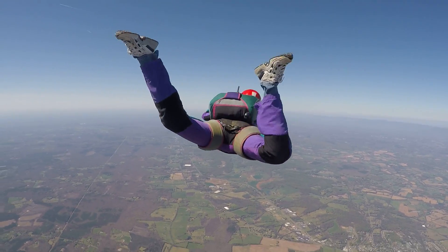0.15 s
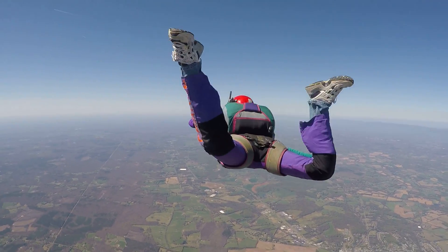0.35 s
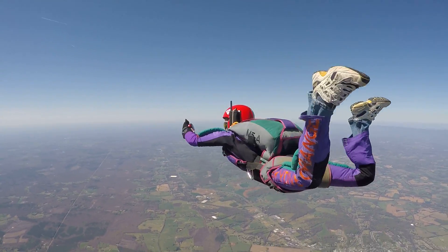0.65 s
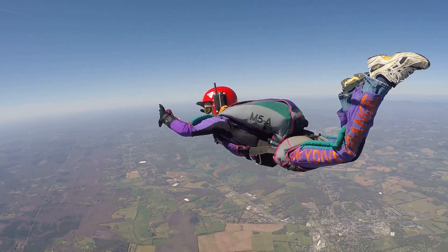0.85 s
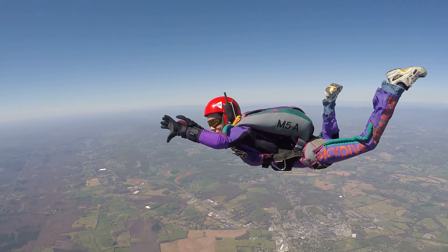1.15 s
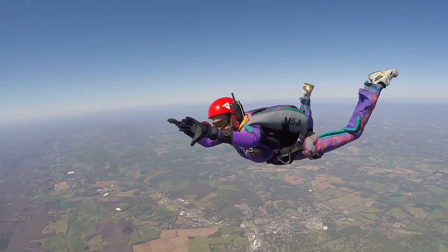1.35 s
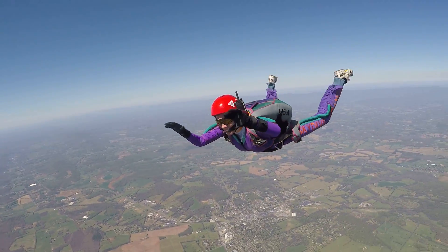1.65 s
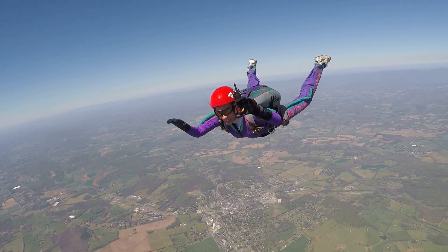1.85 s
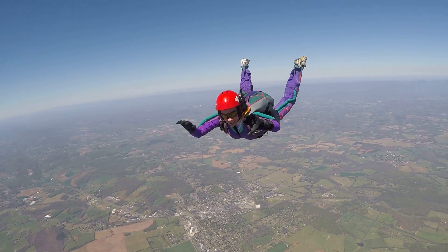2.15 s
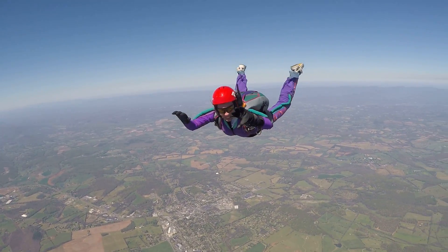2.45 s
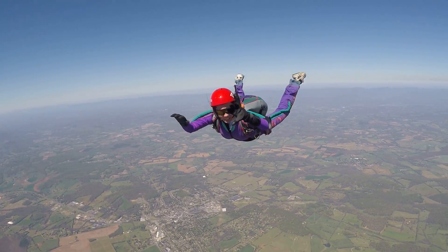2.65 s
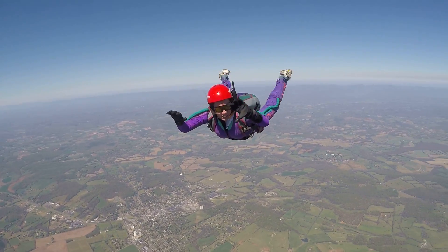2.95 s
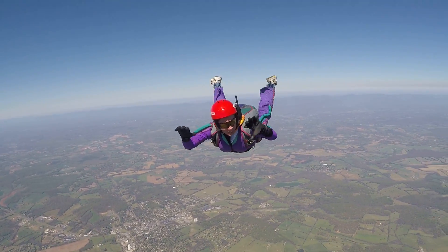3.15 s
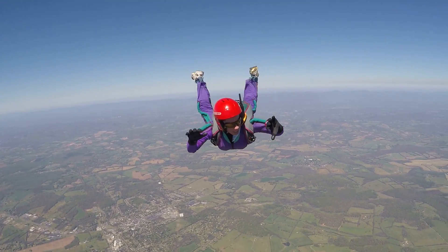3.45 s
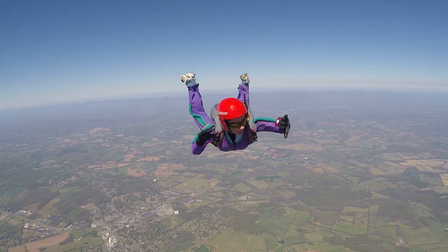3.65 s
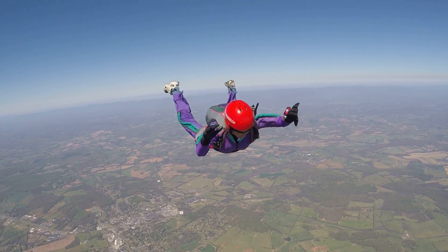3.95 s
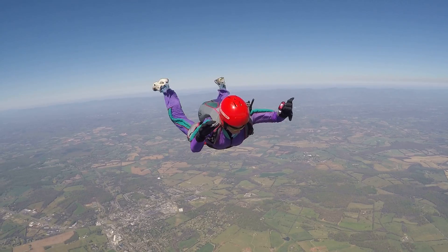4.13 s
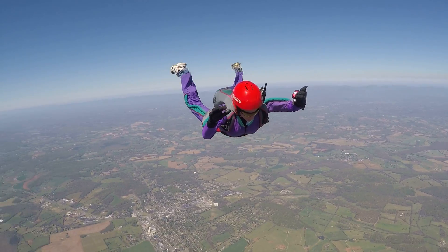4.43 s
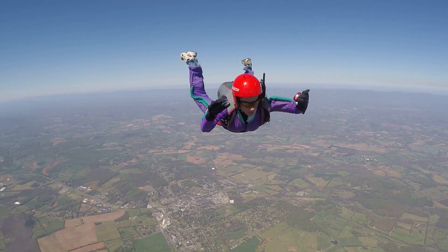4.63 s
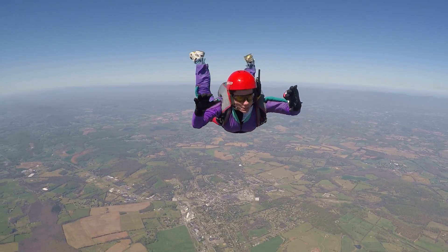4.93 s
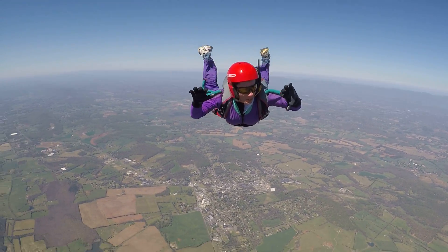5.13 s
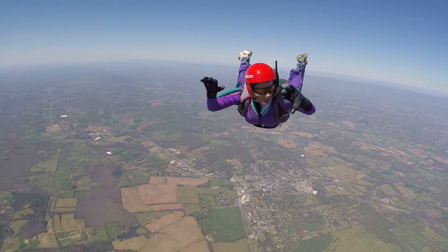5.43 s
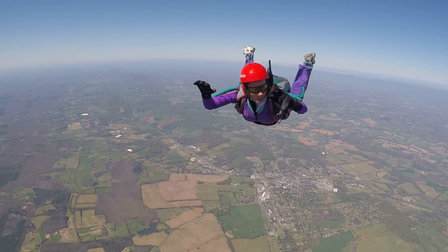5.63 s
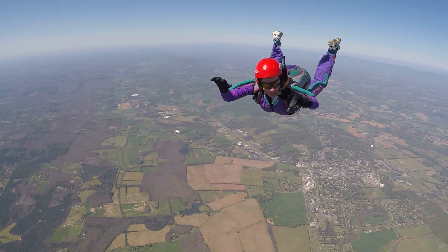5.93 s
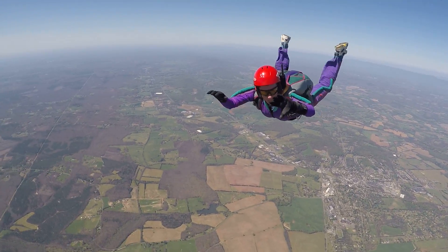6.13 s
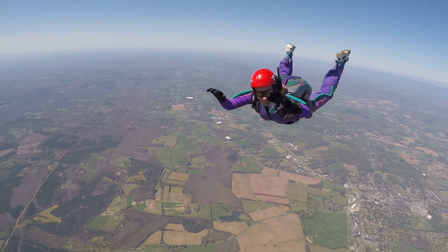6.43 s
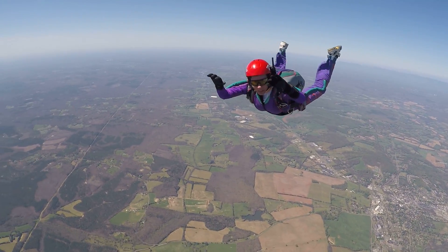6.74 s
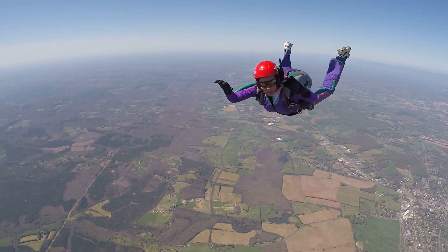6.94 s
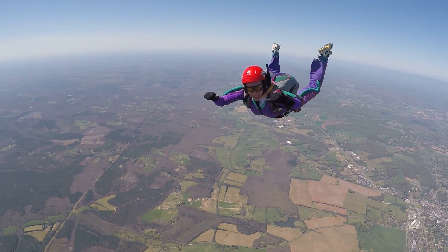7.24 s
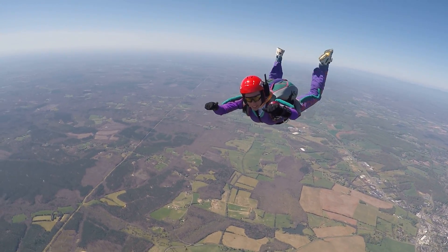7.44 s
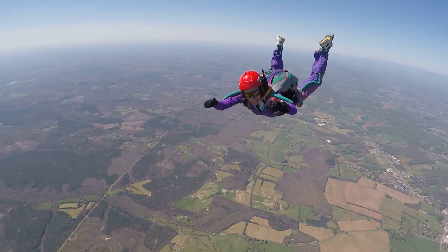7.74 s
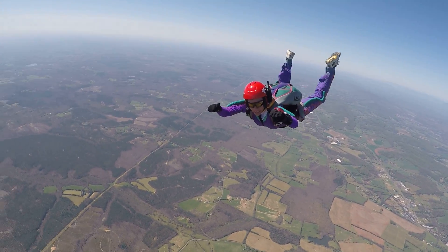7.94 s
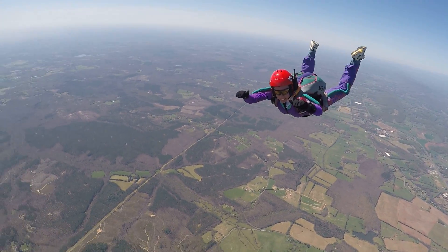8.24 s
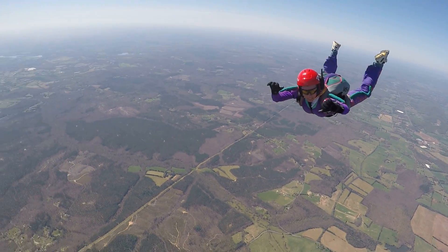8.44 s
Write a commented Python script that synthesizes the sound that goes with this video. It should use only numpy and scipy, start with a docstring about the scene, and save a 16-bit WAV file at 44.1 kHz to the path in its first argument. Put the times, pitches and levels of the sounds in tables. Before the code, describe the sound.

Loud freefall wind pounds a skydiver's helmet camera, deep rumbling buffets under sputtering gusts and hiss that turns much brighter near the end.

```python
"""Freefall wind tears past a helmet camera, made from random noise shaped in colour and level.
Large eddies buffet the microphone port with a deep rumble, a throb, a slow heave and a lumpy churn.
Smaller eddies break at the port's edge in sputtering gusts and bursts of roar and hiss, over an even hiss.
The housing's cavity adds short pips, made from fading sine waves.
The camera's gain control narrows the loudness range and rounds off the peaks."""
import sys
import numpy as np
from scipy import signal
from scipy.fft import rfft, irfft, next_fast_len
from scipy.io import wavfile
from scipy.ndimage import uniform_filter1d, map_coordinates

SR = 44100
rng = np.random.default_rng(int(sys.argv[2]) if len(sys.argv) > 2 else 0)


def master_out(mix):
    """Clip the mix to full scale and print it as 16-bit PCM to the path in sys.argv[1]."""
    frames = np.transpose(np.atleast_2d(mix))
    ceiling = np.clip(frames, -1, 1)
    pcm = np.round(ceiling * 32767).astype(np.int16)
    wavfile.write(sys.argv[1], SR, pcm)


N = 378378

# the airstream between gusts: (time [s], even hiss level [dB], roar level before gusts and drift [dB])
AIRFLOW = [(0.0, -51, -28), (0.5, -54, -31), (1.2, -53.5, -32), (1.86, -53, -32), (2.05, -58, -36),
           (2.87, -51.5, -29), (3.32, -53, -33), (3.68, -51, -28), (4.1, -56, -34), (4.61, -50, -27),
           (4.9, -52.5, -28), (5.27, -54.5, -29), (5.49, -48, -24.5), (6.16, -46, -22), (6.45, -48, -24),
           (6.9, -49.5, -26), (7.38, -49, -18), (7.75, -47, -22), (8.1, -31.5, -17.5), (8.3, -35, -17.5),
           (8.58, -40.5, -22)]


def amp(db):
    """Turn a level in dB into a gain."""
    return 10 ** (np.asarray(db) / 20)


def unit(x):
    """Scale x to an average strength (rms) of 1."""
    return x / np.sqrt(np.mean(x ** 2) + 1e-20)


def curves(rows):
    """Draw straight lines between the rows: one value per sample for each column after the time."""
    s, *columns = np.transpose(rows)
    return [np.interp(np.arange(N) / SR, s, column) for column in columns]


def wobble(rate):
    """Draw a smooth random curve through `rate` random points a second."""
    knots = rng.standard_normal(N // 20)
    return map_coordinates(knots, [np.arange(N) * rate / SR])


def filtered(x, response):
    """Multiply each frequency of x by response(frequency in Hz)."""
    m = next_fast_len(N + 8192)  # spare room keeps the end from wrapping round to the start
    spectrum = rfft(x, m) * response(np.fft.rfftfreq(m, 1 / SR))
    return irfft(spectrum, m)[..., :N]


def rush(spectrum, patchy_db):
    """Moving air: noise of rms 1 in a (Hz, dB) colour, with random louder and softer patches."""
    z = signal.stft(rng.standard_normal(N), nperseg=256)[2]
    # smooth random gains, first across frequency and then across time
    field = uniform_filter1d(rng.standard_normal(z.shape), size=8, axis=0)
    field = uniform_filter1d(field, size=4, axis=1)
    noise = signal.istft(z * amp(patchy_db * unit(field)), nperseg=256)[1][:N]
    hz, db = np.transpose(spectrum)
    return unit(filtered(noise, lambda f: amp(np.interp(np.log(f + 1), np.log(hz + 1), db))))


def buffet():
    """Big eddies push the diaphragm; part of them is shed at a loose, wandering rate and throbs."""
    # the deep buffeting before random drift: (time [s], rumble level [dB], throb level [dB])
    buffet_levels = [(0.0, -12, -18), (0.4, -15.5, -24), (1.17, -14.5, -19), (1.55, -16.5, -21),
                     (1.85, -13.5, -14), (2.0, -20, -24), (2.34, -13, -12), (2.95, -12, -25),
                     (3.25, -14.5, -13), (3.7, -15, -14), (4.2, -14.5, -19), (4.6, -14.5, -16),
                     (5.07, -14, -14), (5.2, -13, -36), (5.6, -12.5, -25), (5.95, -12, -21),
                     (6.2, -14, -15), (6.45, -15, -27), (6.72, -12, -11), (6.91, -22, -23),
                     (7.3, -13.5, -28), (7.55, -13, -26), (7.87, -19, -20), (8.15, -15, -28),
                     (8.58, -14, -24)]
    # colour of the rumble: (frequency [Hz], relative level [dB])
    rumble_colour = [(8.8, -36), (15, -3), (65, -4), (120, -8), (157, -12.5), (286, -23.5), (332, -33),
                     (373, -28), (500, -42.5), (650, -62), (1100, -120)]
    # vortices shed at a loose rate: (middle rate [Hz], width [Hz])
    shedding = (67, 13.2)
    rumble_db, throb_db = curves(buffet_levels)
    center, width = shedding

    # two slow noises steer the strength and timing of the throb
    slow = filtered(rng.standard_normal((2, N)), lambda f: 1 / (1 + (2 * f / width) ** 2))
    phase = 2 * np.pi * np.cumsum(center * (1 + 0.0699 * wobble(4))) / SR
    throb = unit(slow[0] * np.cos(phase) + slow[1] * np.sin(phase))
    throb = amp(throb_db + 1.5 * wobble(5)) * throb

    rumble_gain = amp(rumble_db + 1.3 * wobble(11) + 1.2 * wobble(3))
    return rumble_gain * rush(rumble_colour, patchy_db=0.3) + throb


def gusts(lingers):
    """Level in dB of the gusts alone: each climbs to its crest and sinks back, `lingers` times as slowly."""
    # gusts on the port: (time [s], crest of the hiss [dB], rise per 10 dB [s], fall per 10 dB of hiss [s])
    gust_rows = [(.0, -43, .03, .05), (.16, -42, .3, .11), (.33, -38.5, .036, .023), (.46, -48, .04, .2),
                 (.74, -47.5, .3, .2), (.88, -50, .1, .1), (1.0, -46.5, .11, .3), (1.29, -41, .013, .03),
                 (1.36, -39.5, .06, .026), (1.72, -42.5, .02, .035), (1.79, -46, .15, .24),
                 (2.34, -50.5, .23, .5), (2.58, -43.5, .05, .2), (2.87, -42, .095, .075),
                 (2.96, -46, .036, .13), (3.09, -46.5, .1, .05), (3.185, -32, .03, .06),
                 (3.4, -39, .04, .05), (3.53, -36.5, .035, .023), (3.73, -37.5, .045, .09),
                 (4.04, -47, .11, .08), (4.18, -48.5, .09, .25), (4.44, -41.5, .03, .11),
                 (4.71, -44.5, .17, .03), (4.78, -43.5, .02, .07), (4.97, -43, .03, .2),
                 (5.33, -37.5, .024, .054), (5.45, -38.5, .023, .025), (5.64, -42, .3, .03),
                 (5.72, -38.5, .055, .04), (5.82, -40, .08, .08), (5.98, -40.5, .075, .2),
                 (6.09, -36, .2, .033), (6.16, -38.5, .016, .08), (6.24, -37, .04, .1),
                 (6.4, -33, .085, .08), (6.69, -37.5, .1, .04), (6.79, -43, .15, .08),
                 (7.05, -35, .07, .03), (7.18, -36.5, .05, .045), (7.26, -34, .036, .055),
                 (7.55, -38.5, .3, .16), (7.77, -40.5, .03, .12), (7.96, -29.5, .11, .4),
                 (8.16, -24, .1, .05), (8.24, -28, .065, .18), (8.54, -27, .04, .3)]
    t = np.arange(0, N / SR, .001)
    lines = []
    for s, db, rise, fall in gust_rows:
        lines.append(db - 10 * np.maximum((s - t) / rise, (t - s) / (fall * lingers)))
    return np.interp(np.arange(N) / SR, t, np.max(lines, axis=0))


def crackle(count, spread_db, length):
    """Power over time of tiny random bursts, many weak and a few strong; length in s."""
    draw = rng.random((count, 2))
    strength = amp(-2 * spread_db * np.log(draw[:, 1] + 0.0018))
    spikes = np.bincount((draw[:, 0] * N).astype(int), strength, N)
    t = np.arange(-200, 201) / SR
    smeared = np.convolve(spikes, np.exp(-(t / length) ** 2), "same")
    return smeared / smeared.mean()


def bursts(hiss_db, depth, count):
    """Power over time of spray and roar: eddies swell and die in a few ms, the roar more slowly."""
    # the loudest eddies bursting on the port:
    # (time [s], spray level without its tick [dB], roar over spray [dB], length scale [ms])
    loud_bursts = [(.049, -32, 20, 2.1), (.084, -40.5, 24, 1.4), (.128, -29, 5, 2.9), (.164, -29, 17, 1.6),
                   (.1734, -29.5, 15, 2.2), (.214, -29, 12, 1.4), (.325, -31, 8, 4),
                   (.3494, -44.5, 24, 2.4), (.454, -35, 17, 3.2), (.707, -34, 18, 3.1),
                   (.744, -37.5, 18, 1.5), (.9542, -40, 13, 1.6), (.974, -42.5, 20, 1.8),
                   (1.087, -35.5, 16, 4.9), (1.1791, -39, 11, 1.4), (1.285, -32.5, 14, 2),
                   (1.379, -37.5, 8, 1.4), (1.443, -40, 16, 4.1), (1.519, -42, 22, 2.6),
                   (1.6305, -33.5, 16, 1.9), (1.6793, -38.5, 23, 2), (1.7144, -34.5, 18, 2.6),
                   (1.884, -39.5, 19, 5), (2.013, -38.5, 16, 1.5), (2.26, -38.5, 16, 1.8),
                   (2.366, -33.5, 17, 1.7), (2.4625, -37, 19, 2.8), (2.574, -30, 17, 4),
                   (2.6117, -30, 15, 1.7), (2.619, -31.5, 13, 1.4), (2.636, -34, 15, 3.3),
                   (2.6797, -34, 15, 2.2), (2.7211, -36.5, 13, 2), (2.792, -41, 21, 4.1),
                   (2.83, -33.5, 12, 1.4), (2.8766, -27, 16, 1.8), (2.977, -35, 18, 1.5),
                   (3.1, -37, 15, 2.5), (3.1654, -26, 10, 2.8), (3.206, -27.5, 12, 3.8),
                   (3.252, -36.5, 22, 2.4), (3.387, -26.5, 14, 1.7), (3.405, -26, 9, 2),
                   (3.416, -31.5, 17, 2.2), (3.4362, -33.5, 16, 3.1), (3.502, -32.5, 10, 1.2),
                   (3.5135, -31.5, 11, 1), (3.5435, -31.5, 15, 1.7), (3.58, -34.5, 19, 1.5),
                   (3.7196, -27.5, 12, 5.5), (3.734, -28.5, 7, 1.2), (3.7648, -30.5, 15, 1.9),
                   (3.942, -36, 0, 1.8), (4.4256, -29.5, 18, 2.6), (4.4494, -25.5, 16, 3.8),
                   (4.46, -32, 19, 3.1), (4.521, -36, 14, 1.5), (4.5692, -37, 22, 3.2),
                   (4.601, -32.5, 22, 2.1), (4.689, -28.5, 14, 2), (4.6977, -30, 13, 3.4),
                   (4.794, -34, 17, 2.1), (4.979, -30.5, 12, 2.8), (5.028, -32.5, 16, 1.2),
                   (5.1354, -35.5, 14, 1.7), (5.3203, -34, 14, 1.4), (5.447, -25.5, 14, 2.7),
                   (5.589, -35.5, 20, 1.7), (5.701, -32, 15, 2.3), (5.733, -28.5, 16, 2.3),
                   (5.965, -27.5, 15, 5.2), (6.011, -30.5, 16, 1.3), (6.03, -24.5, 11, 1.9),
                   (6.057, -25.5, 16, .9), (6.117, -30.5, 15, 3.2), (6.162, -27.5, 7, 2.2),
                   (6.178, -27.5, 9, 2.1), (6.227, -28.5, 14, 1.3), (6.236, -30, 9, 2.1),
                   (6.278, -27.5, 9, 1.8), (6.3555, -27, 14, 1.2), (6.3938, -30.5, 14, 3.3),
                   (6.447, -30, 13, 2), (6.488, -34.5, 13, 1.8), (6.7023, -32.5, 12, 1.7),
                   (6.7564, -30, 13, 1.4), (6.801, -39, 24, 2.4), (6.992, -38, 22, 1.8),
                   (7.0393, -26.5, 17, 2.4), (7.157, -30, 12, 2), (7.1885, -32.5, 18, 2.6),
                   (7.2705, -21, 11, 2.4), (7.2829, -28.5, 15, 1.3), (7.319, -37.5, 25, 1.3),
                   (7.3772, -31.5, 16, 3.4), (7.402, -36.5, 21, 1.9), (7.419, -30, 13, 1.8),
                   (7.497, -26.5, 18, 3.7), (7.55, -33.5, 18, 1.6), (7.608, -32.5, 23, 3.7),
                   (7.782, -32, 13, 4.2), (7.8396, -30.5, 17, 2.7), (7.868, -25.5, 19, 1),
                   (8.373, -27, 12, 4.6), (8.407, -25.5, 14, 2)]
    spray, roar = np.zeros(N + SR), np.zeros(N + SR)
    t = np.arange(-800, 801) / SR

    # small bursts at random times, with the same columns
    draw = rng.random((count, 4))
    when = (draw[:, 0] * N).astype(int)
    small_db = hiss_db[when] + depth[when] * (2 + 7 * draw[:, 1])
    small_roar_db = 7 + 12 * draw[:, 3]
    small_ms = 1.9 * (.5 + draw[:, 2])
    small = np.c_[when / SR, small_db, small_roar_db, small_ms]

    for s, db, roar_db, ms in np.r_[small, loud_bursts]:
        start = max(round(s * SR) - 800, 0)
        at = slice(start, start + len(t))
        length = ms / 1000
        swell = np.exp(-np.abs(t / (0.66 * length)) ** 1.23)
        tick = 1.08 * np.exp(-(t / 0.00032) ** 2)  # a sharp tick at the crest
        spray[at] += amp(2 * db) * (swell + tick)  # doubling the dB turns a gain into a power
        roar[at] += amp(2 * (db + roar_db)) * np.exp(-(t / (1.43 * length)) ** 2)
    return spray[:N], roar[:N]


def stream():
    """Small eddies sputter at the port; roar and hiss share gusts and sputter, evening out in strong flow."""
    # colour of the hiss through the housing: (frequency [Hz], relative level [dB])
    hiss_colour = [(590, -8), (1000, 3), (1430, -9), (1840, -2.5), (2730, -5), (2960, -3.5), (4960, -11),
                   (5640, -9), (6860, -14.5), (10100, -15.5), (10900, -20), (12200, -20.5), (13200, -21.5),
                   (14700, -22), (15700, -35)]
    # colour of the bursts' brighter hiss: (frequency [Hz], relative level [dB])
    spray_colour = [(590, -24), (1000, 0), (1950, -14), (2730, -8), (3240, -13.5), (3590, -9),
                    (4320, -17.5), (9580, -21.5), (11400, -26.5), (14200, -31), (15700, -42)]
    # colour of the roar: (frequency [Hz], relative level [dB])
    roar_colour = [(59, -44), (100, -2.5), (172, -0.5), (281, -3), (384, -7.5), (466, -10.5), (987, -25),
                   (1330, -33.5), (2200, -45.5), (2860, -85), (4840, -120)]
    flow_db, roar_db = curves(AIRFLOW)
    calm_db = flow_db - 1.2  # sputtering hiss between gusts, set from the even hiss
    hiss_db = np.maximum(calm_db + 1.2 * wobble(14), gusts(1))

    # the roar rises .6 dB per dB of gust and sinks more slowly than the hiss
    gust_lift_db = np.maximum(gusts(1.5) - calm_db, 0)
    roar_db = roar_db + .6 * gust_lift_db + 1.5 * wobble(12)

    depth = np.interp(flow_db, [-50, -40], [1, .45])  # less sputter in a strong flow
    sputter_db = depth * (0.66 * wobble(40) + 2.0 * wobble(110) + 2.3 * wobble(260))
    spray_burst, roar_burst = bursts(hiss_db, depth, count=200)
    share = np.clip(0.33 * depth, 0, 1)  # part of the hiss power that crackles
    spits = 1 - share + share * crackle(count=500, spread_db=3.0, length=0.00041)

    # square roots turn power into gain
    hiss = amp(hiss_db + sputter_db) * np.sqrt(spits) * rush(hiss_colour, patchy_db=2.0)
    spray = np.sqrt(spray_burst) * amp(1.6 * wobble(500)) * rush(spray_colour, patchy_db=2.0)
    roar_power = amp(2 * (roar_db + 0.82 * sputter_db)) + roar_burst
    roar = np.sqrt(roar_power) * rush(roar_colour, patchy_db=1.22)
    return hiss + spray + roar


def even_hiss():
    """Air streaming over helmet and suit gives a smooth hiss that never stops."""
    # colour of the even hiss: (frequency [Hz], relative level [dB])
    calm_colour = [(590, -30), (1000, -6.5), (1740, -9), (3510, -10.5), (4580, -11), (5140, -21.5),
                   (6110, -16), (7260, -23), (13200, -36), (14500, -36), (15700, -46)]
    level_db = curves(AIRFLOW)[0]
    return amp(level_db) * rush(calm_colour, patchy_db=2.5)


def heave():
    """The largest eddies press slowly on the port: very low noise with a drifting level."""
    # the slowest heave of the air before random drift: (time [s], level [dB])
    heave_levels = [(0.0, -18), (0.5, -16), (1.3, -24), (2.03, -28), (3.68, -21.5), (4.44, -27),
                    (5.93, -29), (7.33, -24), (8.58, -25)]
    # colour of the heave: (frequency [Hz], relative level [dB])
    heave_colour = [(10, -11.5), (30, 0.5), (45, -4.5), (60, -40), (100, -120)]
    level_db, = curves(heave_levels)
    return amp(level_db + 2.5 * wobble(12)) * rush(heave_colour, patchy_db=0.3)


def churn():
    """Middling eddies give a lumpy low roll between rumble and roar."""
    # the churn before random drift: (time [s], level [dB])
    churn_levels = [(0, -40), (2.8, -36), (3.8, -28), (5.1, -29), (5.7, -21), (6.1, -28), (6.9, -30),
                    (7.4, -22), (7.85, -18), (8.05, -29), (8.58, -29)]
    # colour of the churn: (frequency [Hz], relative level [dB])
    churn_colour = [(70, -40), (120, -3), (190, 0), (280, -6), (420, -30), (700, -120)]
    level_db, = curves(churn_levels)
    return amp(level_db + 2.5 * wobble(9)) * rush(churn_colour, patchy_db=0.8)


def pips():
    """The cavity rings briefly now and then as a fading sine; faint pips come at random."""
    # short pips of the cavity: (time [s], level before fade-in and fade-out [dB], pitch [Hz])
    clear_pips = [(0.9732, -43.5, 3040), (1.1363, -39.5, 3250), (1.1882, -45.5, 3580),
                  (1.3024, -42.5, 3370), (1.9669, -42.5, 3360), (2.1335, -35.5, 3220),
                  (2.1854, -45.5, 3490), (2.2194, -41.5, 3560), (3.0235, -40.5, 3190),
                  (3.3253, -43.5, 3560), (3.3368, -36.5, 3260), (3.3514, -39.5, 3630),
                  (3.9414, -39.5, 3530), (4.4094, -33.5, 3460), (4.492, -35.5, 3300)]
    out, t = np.zeros(N + SR), np.arange(SR // 12) / SR
    chance = rng.random((120, 3))
    faint = np.c_[chance[:, 0] * N / SR, -48.5 + 8 * chance[:, 1], 3150 + 550 * chance[:, 2]]
    for s, db, hz in np.r_[clear_pips, faint]:
        fade_out = amp(db - 60 * t / .03)  # falls 60 dB in .03 s
        fade_in = 1 - np.exp(-t / 0.00095)
        out[round(s * SR):][:len(t)] += fade_out * fade_in * np.sin(2 * np.pi * hz * t)
    return out[:N]


def scene():
    """Add up all the sounds that arrive at the one port."""
    return (buffet() + stream() + even_hiss() + heave() + churn() + pips())[None]


def record(dry):
    """Gain control evens out loud and soft, the peaks round off, nothing passes above the band limit."""
    ceiling, top_hz = .93, 15830  # ceiling of the rounding, where full scale is 1; band limit in Hz
    power = np.abs(uniform_filter1d(dry ** 2, size=2000, axis=1)) + 1e-9  # mean over 2000 samples
    held = dry * (power / amp(2 * -11.6)) ** -.15  # gain is 1 at -11.6 dB
    rounded = held / (1 + np.abs(held / ceiling) ** 6) ** (1 / 6)
    return filtered(rounded, lambda hz: hz < top_hz)


dry = scene()
out = record(dry)
master_out(out)
```